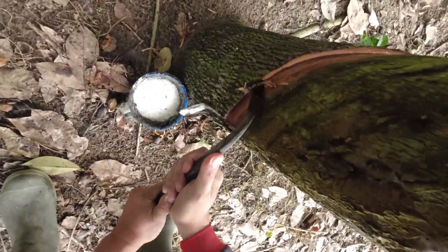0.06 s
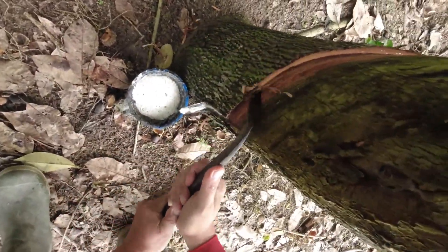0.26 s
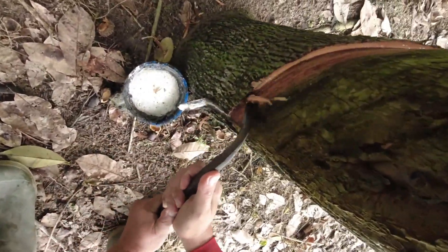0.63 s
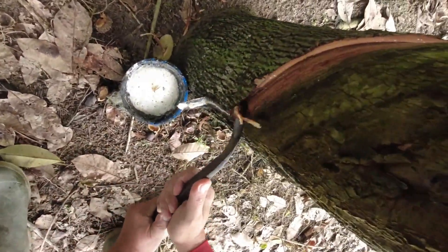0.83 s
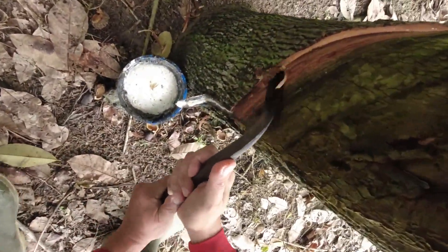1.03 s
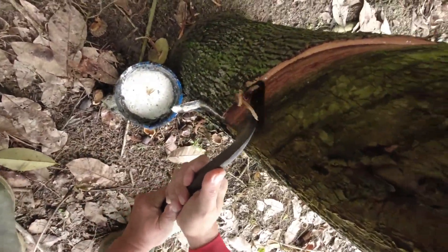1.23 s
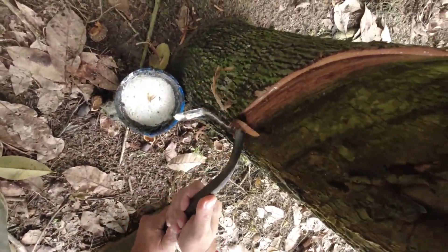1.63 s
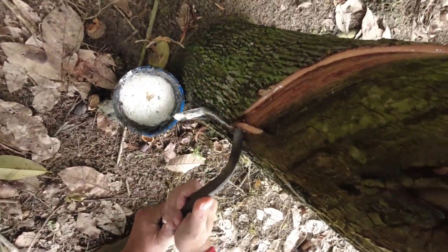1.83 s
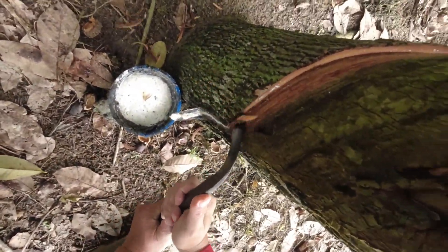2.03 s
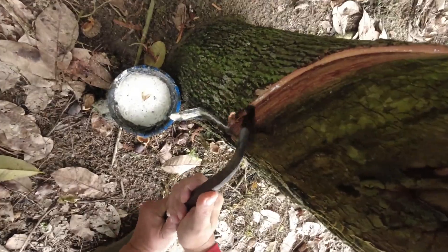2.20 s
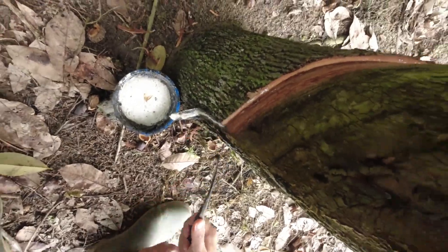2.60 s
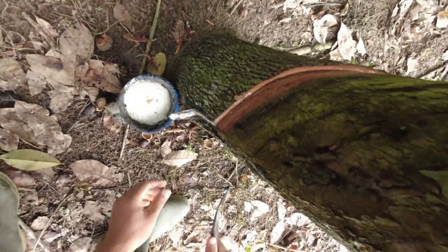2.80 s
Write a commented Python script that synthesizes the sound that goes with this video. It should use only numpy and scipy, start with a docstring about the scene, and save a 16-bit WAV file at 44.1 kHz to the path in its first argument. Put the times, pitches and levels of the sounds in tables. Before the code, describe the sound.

A curved knife shaves bark from a rubber tree close by, in about eleven quick, crackling scrapes with soft thuds and sleeve rustle. The blade finally slips off with ticks and a ping, over a low outdoor rumble.

```python
"""A hooked tapping knife shaves bark from a rubber tree, close by in a quiet plantation.
Over a low outdoor rumble and the rustle of sleeves and dry leaves, the edge scratches into the groove.
Eleven quick pulls follow: tearing fibres crackle into the blade's resonances, the trunk thuds softly,
a sleeve swishes and the blade is reseated. Late on the shank springs free and hums, and a boot turns.
At the end the blade slips off with a few ticks and a ping, leaving the rustle and the rumble."""
import sys
import numpy as np
from scipy import signal
from scipy.fft import rfft, irfft
from scipy.io import wavfile
from scipy.ndimage import uniform_filter1d

SR = 44100
rng = np.random.default_rng(int(sys.argv[2]) if len(sys.argv) > 2 else 0)


def file_out(sig):
    """Save sig as 16-bit WAV at sys.argv[1]."""
    # one column per channel
    cols = np.atleast_2d(sig).T
    # limit, then scale
    lim = np.clip(cols, -1, 1)
    pcm = np.round(lim * 32767).astype(np.int16)
    wavfile.write(sys.argv[1], SR, pcm)


N = 130095
TIME = np.arange(N) / SR
FREQS = np.maximum(np.fft.rfftfreq(N, 1 / SR), 1)

# The tone of each noise layer. Each row: frequency in Hz, relative level in dB.
RUMBLE_EQ = [(20, -13.5), (50, 4), (90, 3), (130, 4.5), (180, -7), (300, -10.5), (500, -24), (1000, -24),
             (2500, -76), (4300, -26), (5500, -51), (7000, -57), (15000, -105.5)]
RUSTLE_EQ = [(120, -32), (210, -2.5), (330, 4.5), (500, -5.5), (1090, -3), (1750, 2.5), (2200, -5),
             (2700, 1.5), (3700, -2), (4900, -5), (5800, -18), (8000, -17), (15000, -83)]
BARK_EQ = [(200, 2.5), (450, -30.5), (780, -3.5), (1100, -1), (1600, 8), (2000, 4.5), (2700, 4),
           (3350, 2.5), (3800, -2.5), (4500, 0.5), (5200, -1.5), (6300, 0.5), (7200, -13.5), (11000, -15.5)]
HISS_EQ = [(3000, -14), (6000, -17.5), (7500, -3), (9200, 0.5), (10500, -6.5), (12200, 4.5), (14500, 3.5),
           (16000, 10)]
SLEEVE_EQ = [(120, -4), (250, 8), (560, 3), (850, 4.5), (1300, -3), (2400, -1.5), (4200, -10),
             (5500, -18.5), (12000, -30)]
BOOT_EQ = [(100, -15), (190, 14.5), (250, 6.5), (330, -24), (600, -42), (2000, -69)]
TICK_EQ = [(300, 2), (800, -41), (1700, -13), (2600, 1.5), (3100, -5), (3700, 0), (4500, -7), (5300, -17.5),
           (14000, -14)]
# The rustle's fader ride. Each row: time in seconds, level in dB.
RUSTLE_RIDE = [(0, -64), (.5, -88), (.6, -51), (.76, -70.5), (.85, -44.5), (.96, -49.5), (1.01, -73.5),
               (1.11, -59), (1.16, -45.5), (1.21, -50.5), (1.3, -77), (1.42, -65), (1.6, -67),
               (2.34, -65.5), (2.56, -69), (2.64, -49), (2.73, -58.5), (2.8, -53.5), (2.95, -54.5)]
# The blade is reseated. Each row: centre in seconds, half-width in seconds, level in dB, pitch ratio.
TOUCHES = [(.008, 0.049, -54.5, 1), (0.087, 0.0059, -48, 1), (0.103, 0.01, -43.5, 1.005),
           (0.123, 0.0047, -38, 1.06), (0.303, 0.032, -60, 1), (0.363, 0.008, -45, 1),
           (0.573, 0.0086, -55, 1.01), (0.698, 0.014, -50, 0.97), (0.957, 0.0067, -46, 1),
           (.988, 0.0063, -44, 0.92), (1.056, 0.034, -55.5, 0.92), (1.456, 0.013, -48.5, 0.96),
           (1.601, 0.03, -57, 0.96), (2.085, 0.025, -54, 0.99)]
# Resonances of the blade resting lightly, the blade pressed into bark, and the long shank bending.
# Each row: frequency in Hz, bandwidth in Hz, relative level in dB.
LIGHT_BLADE_MODES = [(1720, 750, -11.5), (2620, 165, 1.5), (3730, 190, -7.5), (4213, 93, 4.5),
                     (4450, 120, -1), (6160, 130, -13), (9230, 210, -18)]
PRESSED_BLADE_MODES = [(1083, 76, -8.5), (1548, 134, -9.5), (1712, 74, -6.5), (2180, 97, 2.5),
                       (2421, 112, 3), (2985, 117, -5), (3806, 215, 1), (4112, 82, 5.5), (4440, 86, -2),
                       (6072, 53, -3), (9150, 138, -14.5)]
SHANK_MODES = [(568, 20, -2), (895, 16, -7)]
# Pulls of the knife. Each row: start, rise and length in seconds, blade, bark and hiss levels in dB,
# hiss lag in seconds, shank level in dB, blade pitch ratio, blade tilt in dB per octave,
# sleeve level in dB.
PULLS = [(0.128, 0.049, 0.078, -29.5, -41, -37, -0.011, -58, 1.018, -0.5, -47),
         (0.364, 0.051, 0.075, -29.5, -43, -39.5, 0.014, -50, 1.01, 0.5, -63.5),
         (0.619, 0.036, 0.064, -34.5, -39, -40.5, 0.017, -57.5, 1.025, 1, -57),
         (0.877, 0.015, 0.097, -50.5, -48.5, -49.5, 0.014, -67, 1.03, 9, -62),
         (1.204, 0.045, 0.071, -35, -35.5, -40.5, 0.0028, -53, 1, -0.5, -63.5),
         (1.472, 0.011, 0.052, -32.5, -38, -33.5, -0.0035, -62, 1.03, -6, -54),
         (1.673, 0.044, 0.083, -33.5, -37, -34.5, 0.00032, -57, 1.04, 1, -50),
         (1.902, 0.062, 0.082, -33.5, -38.5, -39, 0.002, -52.5, 1.02, -3, -52),
         (2.131, 0.036, 0.079, -32.5, -41.5, -37, -0.0026, -58, 1.024, -5.5, -54.5),
         (2.37, 0.04, 0.062, -35.5, -40, -37.5, 0.0045, -54, 1.02, -5, -57),
         (2.583, 0.024, 0.038, -35.5, -37.5, -32, -0.0024, -54, 1.01, 8.5, -62)]
# The edge catches and the force jumps. Each row: time in seconds, boost in dB.
CATCHES = [(.198, 4), (0.375, 5), (0.384, 4.5), (0.434, 4.5), (1.479, 1), (1.682, 6), (1.914, 8),
           (1.981, 3), (2.151, 4.5), (2.367, 11)]
# Soft thuds of the trunk. Each row: peak time in seconds, level in dB, pitch in Hz.
THUDS = [(0.205, -45.5, 123), (0.389, -41, 107), (0.455, -40, 105), (0.495, -42, 123), (0.533, -40, 122),
         (0.683, -43, 122), (0.926, -39, 107), (0.974, -41.5, 111), (1.276, -44, 95), (1.494, -41.5, 102),
         (1.52, -41, 119), (1.626, -43.5, 106), (1.696, -42.5, 116), (1.758, -47, 88), (1.838, -35.5, 113),
         (1.888, -42, 120), (1.943, -40, 117), (2, -38, 118), (2.05, -39.5, 109)]
# The shank springs free. Each row: start in seconds, pitch in Hz, level in dB, T60 in seconds.
SPRINGS = [(2.417, 579, -45, 0.17), (2.422, 915, -50, 0.42), (2.602, 559, -39, 0.1)]
# The blade slips off. Each row: start in seconds, grit level in dB, ring level in dB,
# longest T60 in seconds that the contact allows.
TICKS = [(2.637, -37.5, -50, 0.028), (2.662, -38.5, -40.5, 0.035), (2.675, -48, -53, 0.03),
         (2.688, -55, -47, 0.03), (2.696, -50, -38, 0.6)]
# The free blade's ping. Each row: frequency in Hz, relative level in dB, T60 in seconds.
PING_MODES = [(1561, -7.5, .29), (1980, -5, .08), (2510, 0, .055), (2910, -7, .025), (3610, -4, .03),
              (4220, -5, .03), (4480, -5, .035)]
# The tone of the scatter from trunks and ground. Each row: frequency in Hz, gain in dB.
SCATTER_EQ = [(150, -18), (400, 15.5), (900, -7.5), (1600, -7.5), (2500, -19.5), (4200, -16), (7000, -13),
              (14000, -18)]
# Phase between the two stereo ports. Each row: frequency in Hz, phase in radians.
PORT_PHASE = [(100, 0), (1400, .1), (2100, .7), (3800, .7), (4800, -1.1), (6000, -.7), (7500, 1.1),
              (9100, -1.4), (11000, -1.2), (12000, -1.2), (12600, 1.25), (15000, 1.25)]
# The unrelated part of the two channels. Each row: frequency in Hz, side gain in dB.
WIDTH_EQ = [(30, -21), (100, -26), (300, -20), (650, -10), (1400, -16), (2100, -10), (4100, -9.5),
            (7500, -3), (15000, -3)]


def from_db(db):
    """Decibels to gain."""
    return 10 ** (np.asarray(db) / 20)


def unit_rms(x):
    """Scale to rms 1."""
    return x / np.sqrt(np.mean(x ** 2) + 1e-20)


def gains(eq):
    """An EQ curve's gain at every frequency."""
    hz, db = np.transpose(eq)
    return from_db(np.interp(np.log(FREQS), np.log(hz), db))


def colour(x, eq):
    """Shape a steady signal with an EQ curve; rms 1."""
    return unit_rms(irfft(rfft(x) * gains(eq), N))


def drift(hz):
    """Random modulation, rolled off above hz; rms 1."""
    return unit_rms(irfft(rfft(rng.standard_normal(N)) / (1 + (FREQS / hz) ** 2), N))


def swell(centre_s, half_width_s):
    """A bell-shaped envelope that peaks at 1."""
    return np.exp(-((TIME - centre_s) / half_width_s) ** 2)


def snaps(per_s, spread_db):
    """Two unrelated trains (mid, side) of tiny clicks of uneven size; rms 1."""
    sizes = from_db(spread_db * np.minimum(rng.exponential(1, (2, N)), 4))
    signs = rng.choice([-1, 1], (2, N))
    return unit_rms(sizes * signs * (rng.random((2, N)) < per_s / SR))


def resonate(x, hz, width_hz):
    """One resonance, gain 1 at its peak."""
    r = np.exp(-np.pi * width_hz / SR)
    feedback = [1, -2 * r * np.cos(2 * np.pi * hz / SR), r * r]
    return signal.lfilter([(1 - r * r) / 2, 0, (r * r - 1) / 2], feedback, x + 1e-18)


def moving_modes(drive, modes, pitch, tilt_db=0, pivot_hz=3000):
    """Resonances that follow a pitch ratio and a tilt; the contact favours now one, now another."""
    warped_time = np.cumsum(pitch + 0.012 * drift(hz=20)) / SR
    out = 0
    for k, (hz, width, db) in enumerate(modes):
        r = np.exp(-np.pi * width / SR)
        spin = np.exp(2j * np.pi * hz * warped_time)
        ring = (spin * signal.lfilter([1 - r], [1, -r], drive / spin + 1e-18)).real
        octaves = np.clip(np.log2(hz / pivot_hz), -.5, .5)
        flicker_db = 1.4 * drift(hz=31.3)
        out += (-1) ** k * from_db(db + tilt_db * octaves + flicker_db) * ring
    return out


def rumble():
    """A steady, low outdoor bed."""
    return from_db(-52.5) * colour(rng.standard_normal((2, N)), RUMBLE_EQ)


def rustle():
    """Sleeves and dry leaves brush as the stance shifts."""
    level_db = np.interp(TIME, *np.transpose(RUSTLE_RIDE)) + 1.3 * drift(hz=37)
    brush = colour(snaps(per_s=7100, spread_db=-2.5), RUSTLE_EQ)
    lowpass = signal.butter(5, 5600, fs=SR, output="sos")
    return from_db(level_db) * signal.sosfilt(lowpass, brush)


def reseat_scratches():
    """Light, short scratches as the edge finds the groove, each at its own pitch."""
    level = sum(from_db(db) * swell(s, half_width) ** 2 for s, half_width, db, _ in TOUCHES)
    lowpass = signal.butter(3, 7500, fs=SR, output="sos")
    grit = signal.sosfilt(lowpass, snaps(per_s=6900, spread_db=3.0))
    times, *_, pitch = np.transpose(TOUCHES)
    return level * unit_rms(moving_modes(grit, LIGHT_BLADE_MODES, np.interp(TIME, times, pitch)))


def blade_ring(fibres, glide=0.05, evenness=0.23, window_s=0.002):
    """The damped blade rings higher as the edge sinks in during a pull; friction evens out its swing."""
    course = [(start + progress * length, pitch + glide * (progress - .5), tilt_db)
              for start, _, length, *_, pitch, tilt_db, _ in PULLS for progress in (0, 1)]
    times, pitches, tilts_db = np.transpose(course)
    pitch, tilt_db = np.interp(TIME, times, pitches), np.interp(TIME, times, tilts_db)
    ring = moving_modes(fibres, PRESSED_BLADE_MODES, pitch, tilt_db)
    power = uniform_filter1d(ring ** 2, int(window_s * SR))
    return unit_rms(ring / np.maximum(power, 1e-12) ** (evenness / 2))


def pull_force_db(age, rise, length, attack_db_per_s=888, release_db_per_s=1514):
    """The force of one pull bites in, peaks, slackens and lets go."""
    bite_db = 15 * np.clip(1 - age / rise, 0, 1) ** 2
    slack_db = 14.5 * np.clip((age - rise) / (length - rise), 0, 1) ** 2
    fade_db = attack_db_per_s * np.maximum(-age, 0) + release_db_per_s * np.maximum(age - length, 0)
    return np.maximum(-bite_db - slack_db - fade_db, -120)


def random_ripple(x, ripple_db, spacing_hz):
    """Random peaks and dips give each pull's rasp and hiss its own uneven colour; rms 1."""
    knots = np.arange(0, SR / 2, spacing_hz)
    heights = np.clip(rng.standard_normal(len(knots)), -1.5, 1.5)
    return unit_rms(irfft(rfft(x) * from_db(ripple_db * np.interp(FREQS, knots, heights)), N))


def crumb_hiss(hiss, force_db, lag_s, fade_db_per_s=800):
    """The hiss follows the force, and crumbs keep it going after the force lets go."""
    fall_db = fade_db_per_s * TIME
    held_db = np.maximum.accumulate(force_db + fall_db) - fall_db
    level = from_db(np.interp(TIME - lag_s, TIME, held_db))
    return level * random_ripple(hiss, ripple_db=5.0, spacing_hz=252.3)


def shank_ring(bending):
    """The long shank bends under the pull and rings below the blade."""
    return sum(from_db(db) * resonate(bending, hz, width) * np.sqrt(SR / np.pi / width)
               for hz, width, db in SHANK_MODES)


def knife_pulls():
    """Fibres snap in juddering bunches: ringing steel, rasping bark and a bright hiss on top."""
    fibres = snaps(per_s=11000, spread_db=1.5)
    steel = blade_ring(fibres)
    bark = colour(snaps(per_s=16000, spread_db=0.5), BARK_EQ)
    judder_db = 1.8 * drift(hz=120)
    catch_db = sum(db * swell(s, half_width_s=0.004) for s, db in CATCHES)
    hiss = colour(fibres, HISS_EQ) * from_db(3.2 * drift(hz=42))
    out, bending = 0, 0
    for start, rise, length, blade_db, bark_db, hiss_db, hiss_lag, shank_db, *_ in PULLS:
        force_db = pull_force_db(TIME - start, rise, length) + judder_db + catch_db
        rasp = random_ripple(bark, ripple_db=3.5, spacing_hz=132.3)
        out += from_db(force_db) * (from_db(blade_db) * steel + from_db(bark_db) * rasp)
        out += from_db(hiss_db) * crumb_hiss(hiss, force_db, hiss_lag)
        bending += from_db(force_db + shank_db) * fibres
    return out + shank_ring(bending)


def trunk_thuds(rise_s=0.00842):
    """Each jolt gives a few low, uneven cycles of the trunk."""
    wobble = 1 + 0.099 * drift(hz=40)
    out = 0
    for peak_s, db, hz in THUDS:
        age = np.maximum(TIME - peak_s + rise_s, 0)
        envelope = age / rise_s * np.exp(1 - age / rise_s)
        cycles = hz * np.cumsum(wobble * (age > 0)) / SR
        out += from_db(db) * envelope * np.sin(2 * np.pi * cycles)
    return out


def sleeve_swishes(delay_s=0.026):
    """The sleeve follows through after every pull."""
    level = sum(from_db(db) * swell(start + length + delay_s, half_width_s=0.055)
                for start, _, length, *_, db in PULLS)
    return level * colour(snaps(per_s=6000, spread_db=3.5), SLEEVE_EQ)


def shank_springs(rise_s=0.0037):
    """Near the end of the groove the shank is let go and hums briefly."""
    out = 0
    for start, hz, db, t60 in SPRINGS:
        age = np.maximum(TIME - start, 0)
        envelope = from_db(db - 60 * age / t60) * (1 - np.exp(-age / rise_s))
        out += envelope * np.sin(2 * np.pi * hz * age)
    return out


def boot_shuffle():
    """A boot turns on the soil with one dull scuff."""
    level = from_db(-55) * swell(centre_s=2.53, half_width_s=0.11)
    return level * colour(rng.standard_normal((2, N)), BOOT_EQ)


def slip_off(ping_rise_s=0.0005, grit_decay_s=0.0065):
    """The blade chatters over the edge of the cut, damped by each contact, then rings freely."""
    grit = colour(rng.standard_normal((2, N)), TICK_EQ)
    out = 0
    for start, grit_db, ring_db, longest_t60 in TICKS:
        age = np.maximum(TIME - start, 0)
        out += (TIME > start) * from_db(grit_db) * np.exp(-age / grit_decay_s) * grit
        attack = 1 - np.exp(-age / ping_rise_s)
        for hz, db, t60 in PING_MODES:
            level_db = ring_db + db + rng.normal(0, 1.2) - 60 * age / min(t60, longest_t60)
            out += attack * from_db(level_db) * np.sin(2 * np.pi * hz * age)
    return out


def grove_scatter(x, t60_s=0.26, build_s=0.016):
    """A short, dull reverb: diffuse scatter from the trunks and the ground."""
    envelope = from_db(-60 * TIME / t60_s) * (1 - np.exp(-TIME / build_s))
    echoes = rng.standard_normal((2, N)) * envelope
    echoes /= np.sqrt(np.sum(echoes[0] ** 2))
    impulse = irfft(rfft(echoes) * gains(SCATTER_EQ), N)[:, :SR]
    return from_db(-7.5) * signal.fftconvolve(x, impulse, axes=1)[:, :N]


def stereo(x):
    """Two close ports: alike in the bass, out of step and less alike in the treble."""
    mid, unrelated = rfft(x)
    phase = np.interp(FREQS, *np.transpose(PORT_PHASE))
    side = irfft(1j * np.tan(phase / 2) * mid + gains(WIDTH_EQ) * unrelated, N)
    return np.array([x[0] + side, x[0] - side])


def scene():
    """The stereo mix: the knife with its reverb; trunk, body movement and rumble left dry."""
    knife = knife_pulls() + reseat_scratches() + shank_springs() + slip_off()
    movement = rustle() + sleeve_swishes() + boot_shuffle()
    return stereo(knife + grove_scatter(knife) + trunk_thuds() + movement + rumble())


def record(dry):
    """A steep high cut: 100 dB down between 15750 and 16050 Hz."""
    hz = np.fft.rfftfreq(2 * N, 1 / SR)
    high_cut = from_db(np.interp(hz, [15750, 16050], [0, -100]))
    return irfft(rfft(dry, 2 * N) * high_cut)[:, :N]


dry = scene()
out = record(dry)
file_out(out)
```